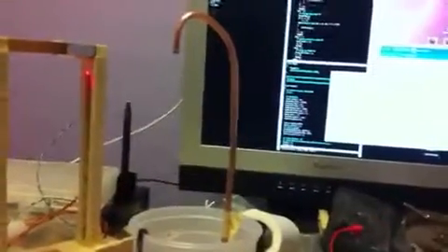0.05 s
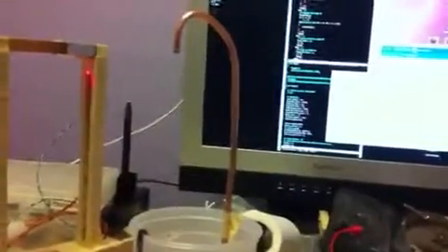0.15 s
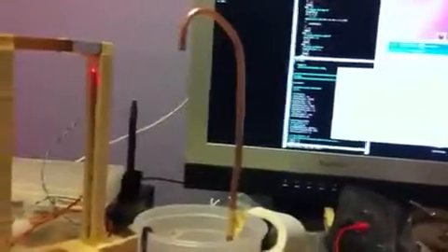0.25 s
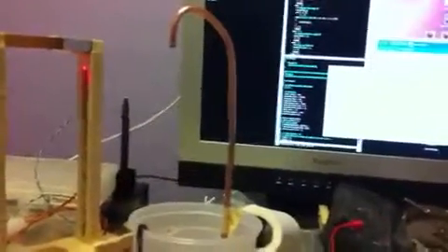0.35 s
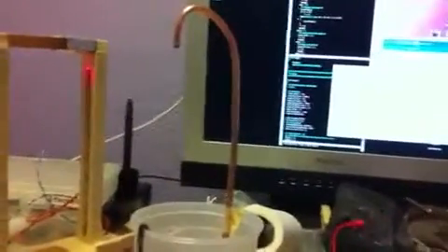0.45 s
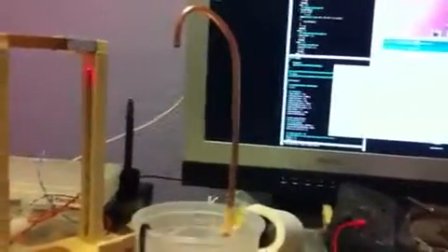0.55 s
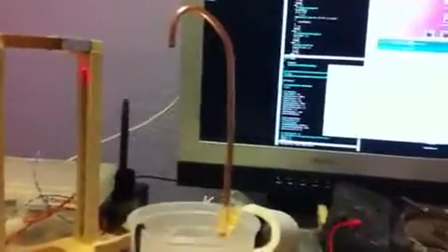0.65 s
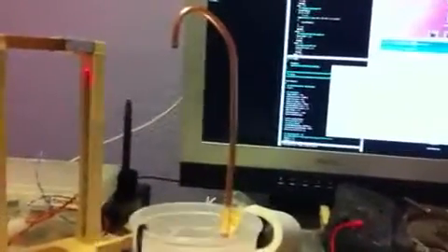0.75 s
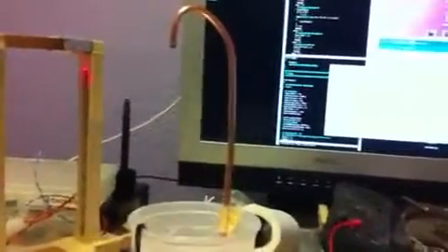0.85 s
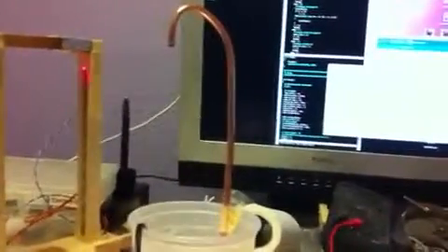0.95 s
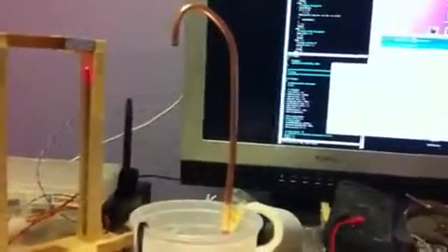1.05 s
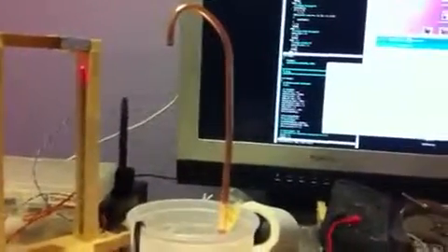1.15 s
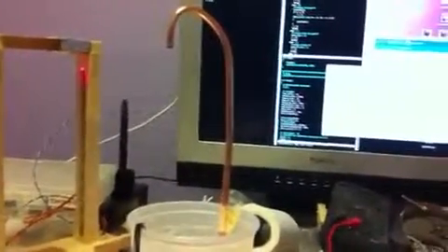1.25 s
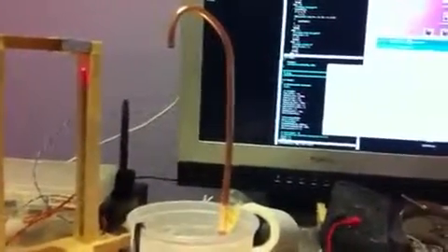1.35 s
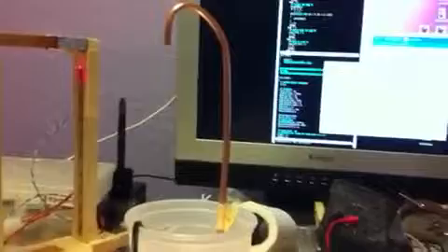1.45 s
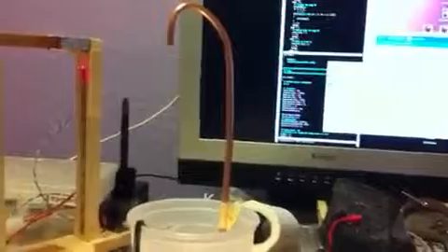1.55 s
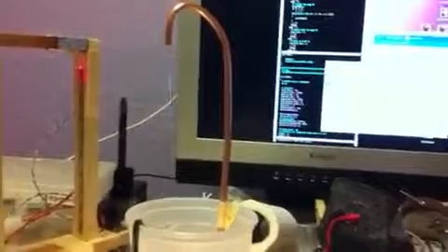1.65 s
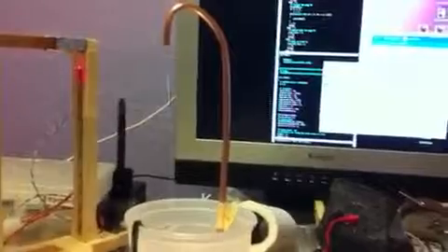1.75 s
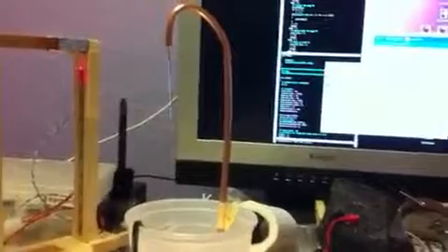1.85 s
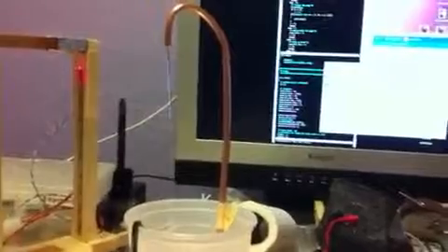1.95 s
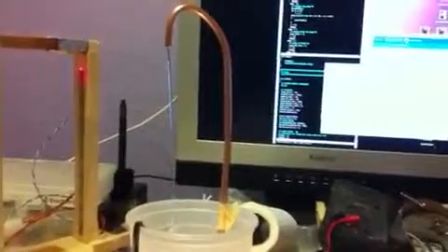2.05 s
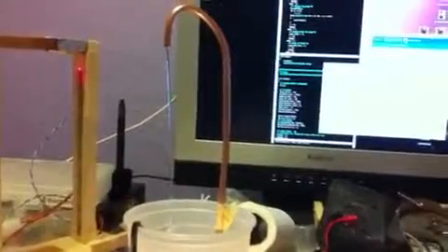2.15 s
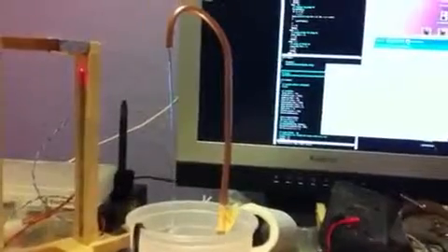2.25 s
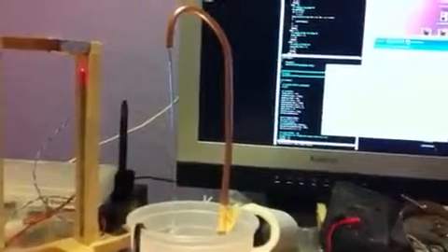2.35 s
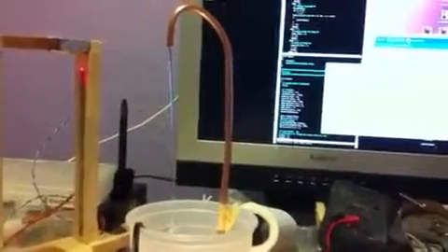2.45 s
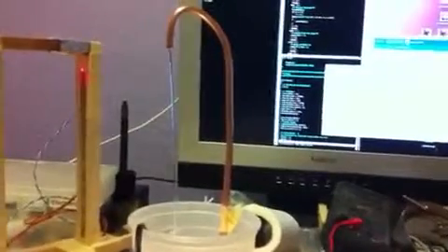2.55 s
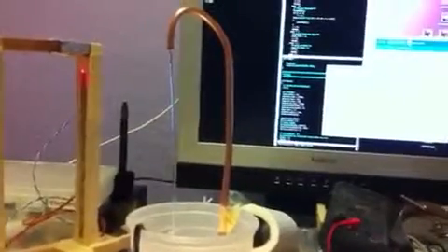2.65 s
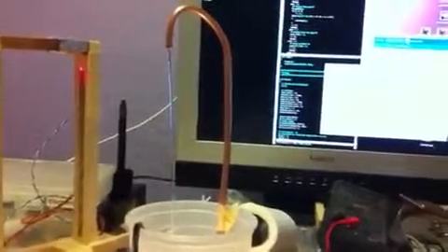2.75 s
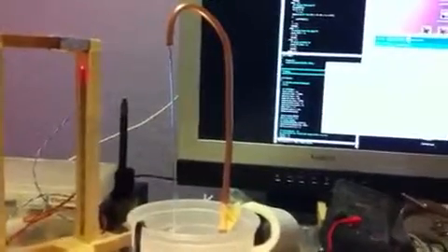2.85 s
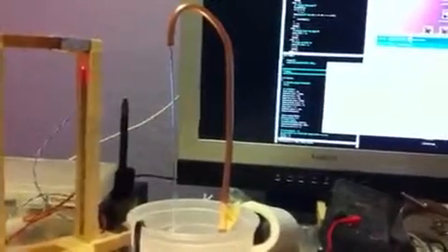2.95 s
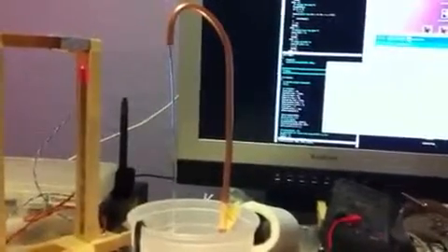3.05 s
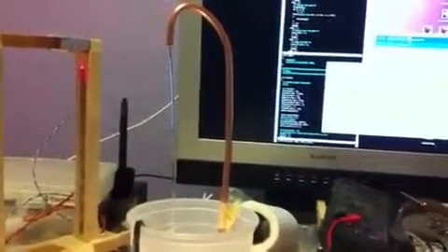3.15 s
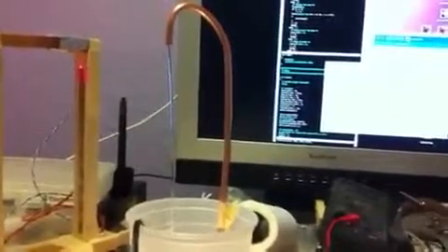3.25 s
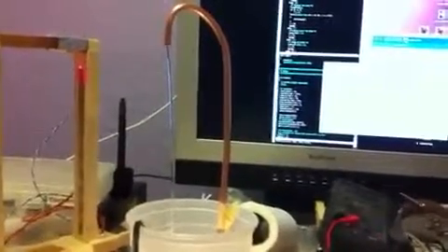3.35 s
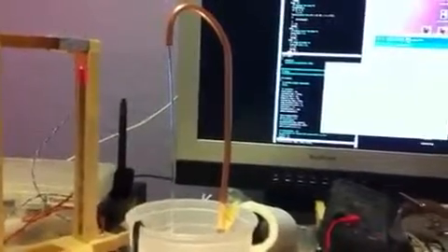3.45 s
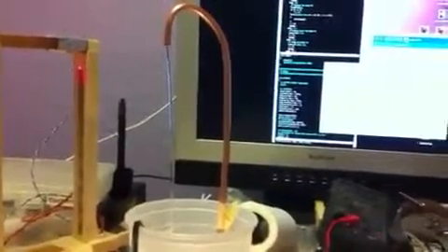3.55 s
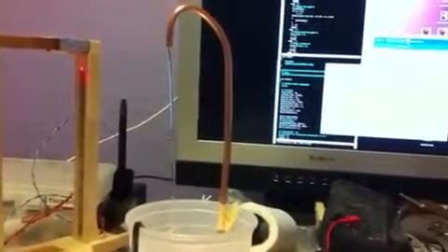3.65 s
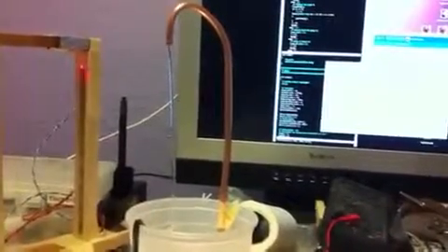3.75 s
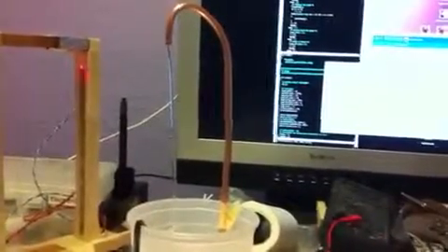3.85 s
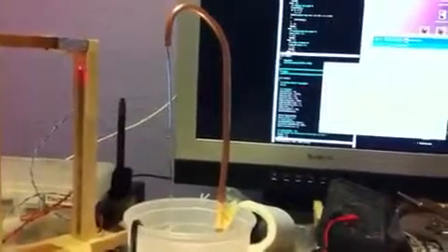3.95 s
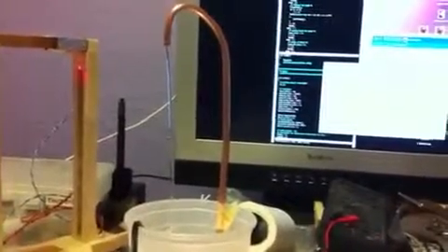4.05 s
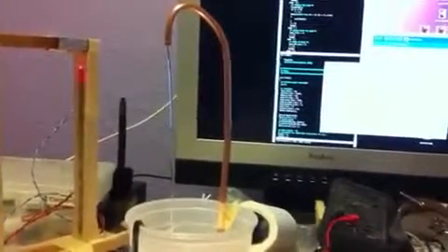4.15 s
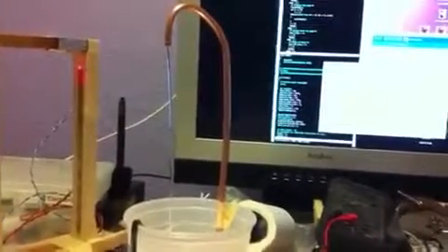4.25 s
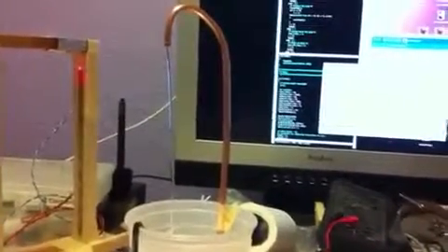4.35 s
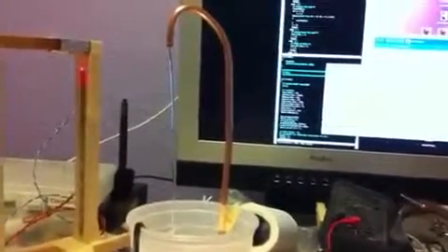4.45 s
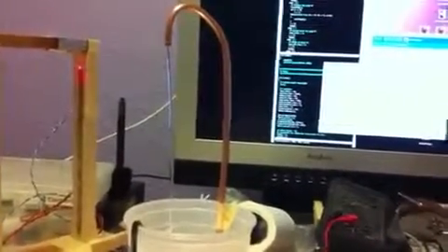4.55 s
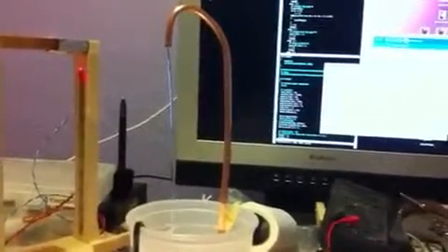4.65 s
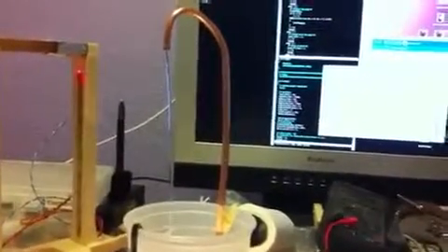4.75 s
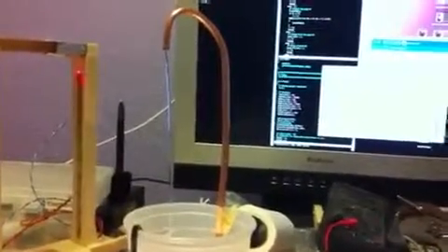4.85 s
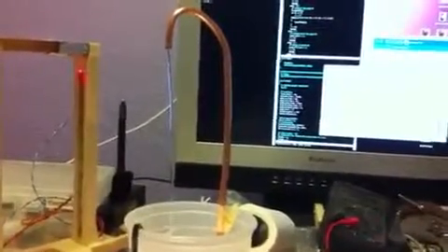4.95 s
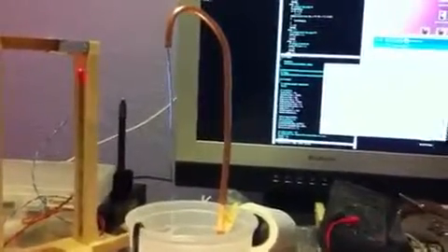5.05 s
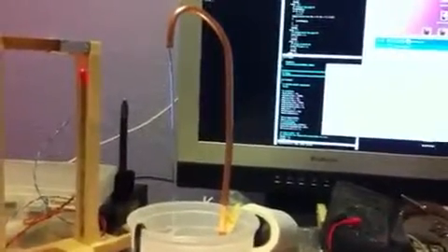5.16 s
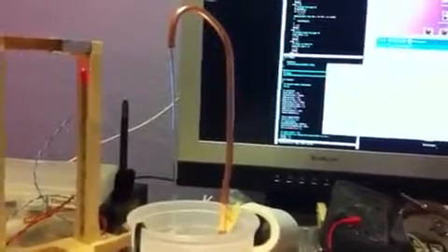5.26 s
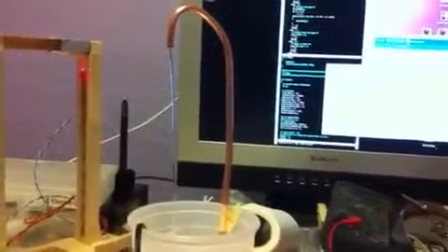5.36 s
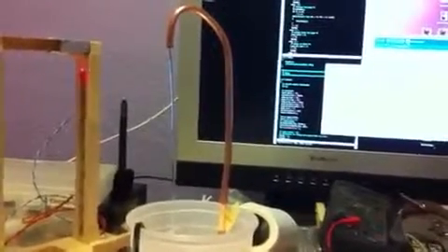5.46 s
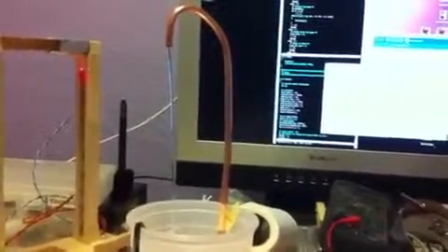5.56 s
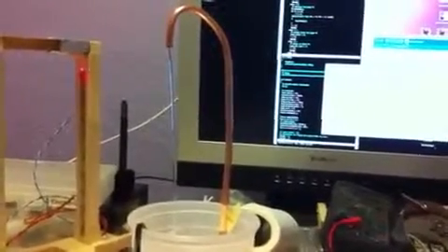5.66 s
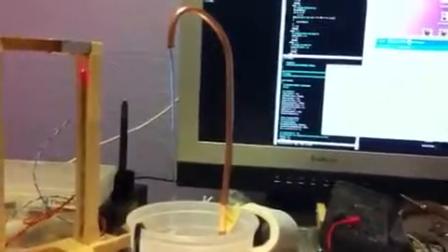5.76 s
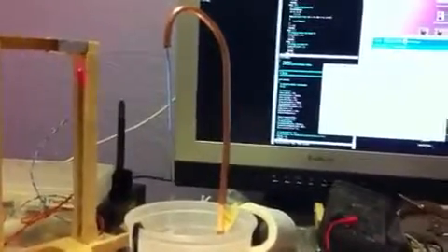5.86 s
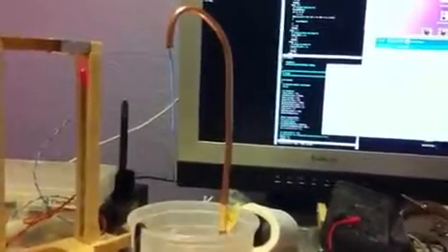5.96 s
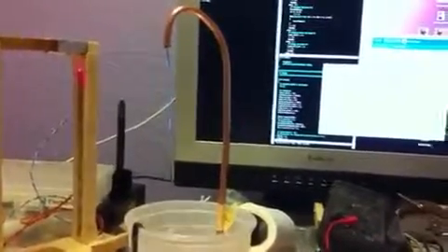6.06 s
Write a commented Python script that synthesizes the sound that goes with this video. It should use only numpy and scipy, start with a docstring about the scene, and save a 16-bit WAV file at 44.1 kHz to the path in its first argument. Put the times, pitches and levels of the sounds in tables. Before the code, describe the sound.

In a small room, a low pump hum and a computer fan's drone sit under soft air noise and a faint high whine. A soft knock comes first, then the pump rises to a buzz. About a second later a thin stream drops into a plastic tub, with hollow, rapid gulps, bubbly chirps and fine bright spatter until the end. One microphone, with short room echoes.

```python
"""First a small pump hums low on a desk in a small room, with a fan's drone, air noise and a faint high whine.
The desk is knocked once and the pump comes up to a buzz; a second later a thin stream falls into a plastic tub.
Gulps of trapped air, made as short swelling tones, ring the tub's hollow; deep plunges raise swarms of bubbles.
Clear bubbles chirp, droplets ping, and filtered impulses make the spray and its ticks on the wall.
One microphone hears it all: resonances add the tub, a sharp reflection and dense echoes add the room."""
import sys
import numpy as np
from scipy import signal
from scipy.fft import rfft, irfft, next_fast_len
from scipy.io import wavfile
from scipy.ndimage import uniform_filter1d, map_coordinates

SR = 44100
rng = np.random.default_rng(int(sys.argv[2]) if len(sys.argv) > 2 else 0)


def wav_record(signal):
    """Record a signal, one row per channel, as 16-bit PCM in the file named by sys.argv[1]."""
    frames = np.transpose(np.atleast_2d(signal))
    bounded = np.clip(frames, -1, 1)
    # unit amplitude maps onto the largest positive 16-bit level
    quanta = np.round(bounded * 32767).astype(np.int16)
    wavfile.write(sys.argv[1], SR, quanta)


N = 268569
T = np.arange(N) / SR
# The first drops land at ARRIVES_S (s); the stream is whole BUILD_S (s) later and then pulls air under.
ARRIVES_S, BUILD_S = 1.85, 0.075
HOLLOW_HZ, HOLLOW_WIDTH_HZ = 810.4, 41

# Gulps of air pulled under by the stream.
# Each row: start in seconds, peak in dB before a common trim, pitch in Hz, time scale in seconds.
GULPS = [(1.9166, -44.5, 850, 0.0053), (1.954, -40.5, 810, 0.0057), (1.969, -40, 809, 0.0054),
         (1.9834, -36, 790, 0.0036), (2.0511, -35, 778, 0.0063), (2.0621, -34, 805, 0.0073),
         (2.0835, -33.5, 804, 0.0054), (2.14, -41, 806, 0.0037), (2.1528, -23, 811, 0.0048),
         (2.1781, -33, 800, 0.0025), (2.2045, -44, 808, 0.0039), (2.2753, -37.0, 816, 0.0039),
         (2.3083, -35.5, 779, 0.0025), (2.3567, -40, 780, 0.012), (2.391, -33, 804.7, 0.0058),
         (2.4233, -35, 827, 0.0015), (2.4815, -31.5, 843, 0.0038), (2.5075, -34, 875, 0.0029),
         (2.5222, -37.5, 821, 0.0049), (2.5358, -36, 950, 0.00164), (2.573, -37, 790, 0.0034),
         (2.6065, -26, 815, 0.0048), (2.6238, -35.5, 814, 0.0028), (2.6551, -35, 843, 0.00546),
         (2.6784, -37, 790, 0.0082), (2.7108, -40.5, 815, 0.0085), (2.7357, -30, 806, 0.0054),
         (2.746, -31, 765, 0.00434), (2.7787, -40, 867, 0.007), (2.8084, -38.5, 838, 0.0055),
         (2.8371, -37.5, 832, 0.005), (2.937, -40, 836, 0.0058), (3.109, -35.5, 854, 0.0022),
         (3.1177, -31.5, 780, 0.0048), (3.1377, -34, 800, 0.006), (3.1988, -37.0, 790, 0.0046),
         (3.2204, -37.5, 795, 0.0053), (3.2841, -38, 831.3, 0.00517), (3.348, -43, 720, 0.0029),
         (3.4015, -33, 815.4, 0.00497), (3.4143, -38, 810, 0.0036), (3.439, -32, 780, 0.0035),
         (3.4766, -35, 790, 0.0036), (3.6166, -41, 822, 0.0095), (3.6667, -35.5, 824.4, 0.0054),
         (3.7222, -38, 789, 0.0072), (3.7559, -38, 847, 0.003), (3.786, -37.5, 713, 0.0049),
         (3.812, -50.5, 680, 0.0079), (3.8343, -39.5, 829, 0.0051), (3.9283, -38.5, 756, 0.0038),
         (3.9529, -40, 818, 0.011), (3.9585, -35, 743.5, 0.0015), (4.0186, -36, 833, 0.0025),
         (4.1011, -37, 863, 0.0032), (4.1356, -34, 799.6, 0.0064), (4.1552, -28, 813, 0.0073),
         (4.2501, -39, 774.3, 0.01), (4.2706, -32.5, 804, 0.0041), (4.2827, -34.5, 826.5, 0.0073),
         (4.3018, -42.5, 883, 0.0074), (4.3157, -37.5, 802.6, 0.0084), (4.4171, -36, 835, 0.0082),
         (4.4957, -34, 776, 0.0071), (4.5162, -26.5, 775, 0.0067), (4.5481, -33.5, 762, 0.00384),
         (4.5683, -35.5, 800, 0.005), (4.5855, -28.0, 842, 0.0028), (4.6024, -34, 823, 0.0033),
         (4.7034, -31, 808, 0.0063), (4.7293, -40, 850, 0.0045), (4.766, -32.5, 805, 0.0038),
         (4.7865, -38.5, 778, 0.0096), (4.847, -31, 812, 0.0052), (4.872, -31, 816.7, 0.0055),
         (4.9186, -27.5, 800, 0.0051), (4.9381, -32, 804, 0.0035), (4.9697, -36.5, 780, 0.0046),
         (4.9913, -38.5, 876, 0.0037), (5.0129, -36, 872, 0.0054), (5.0279, -37.5, 774.6, 0.0045),
         (5.0604, -37, 790, 0.0044), (5.1103, -30.0, 824, 0.0042), (5.1168, -29, 826, 0.0053),
         (5.1858, -27, 804, 0.0053), (5.2075, -33.5, 782.6, 0.00667), (5.2217, -38, 826, 0.0066),
         (5.2556, -32, 822, 0.00523), (5.4196, -32, 792, 0.0034), (5.448, -34, 817, 0.0049),
         (5.4916, -38.5, 784, 0.011), (5.5703, -30, 822, 0.0094), (5.6046, -32.5, 842.6, 0.00414),
         (5.6197, -35, 785, 0.0079), (5.6467, -36.5, 790, 0.0037), (5.6881, -33, 796.8, 0.0039),
         (5.8738, -37, 767, 0.0099), (6.0059, -39, 812, 0.014), (6.018, -34, 797, 0.0049),
         (6.0313, -28.5, 827, 0.011), (6.0723, -39, 810, 0.0064)]


def gulps(trim_db=-1.17, snap_db=-21, wash_db=-33, wash_s=0.018):
    """Each gulp snaps shut and pumps the air in the tub; the water washes back after it."""
    out, wash = np.zeros(N), np.zeros(N)
    t = np.arange(SR // 5) / SR
    for s, peak_db, hz, scale_s in GULPS:
        add(out, s - .001, undb(peak_db + trim_db) * gulp(hz, scale_s))
        add(out, s, undb(peak_db + snap_db) * ring(2000, .0001, 0.00083))
        add(wash, s, undb(peak_db + wash_db) * np.exp(-t / wash_s))
    wash_colour = [(480, 9.0), (680, -13.0), (920, 5.5), (1200, 14.5),
                   (1700, -22.0), (2600, -36.0), (5000, -10.5)]  # (Hz, dB)
    water = unit(colour(impacts(rate=2800, spread_db=-2.5), wash_colour))
    return out + wash * water


def gulp(hz, scale_s, rise_share=0.87, choke=1.19, glide=0.0051):
    """The tone of one gulp of air, peak 1: it swells over a few cycles and is choked off."""
    t = np.arange(int(7 * scale_s * SR)) / SR
    age = t / (rise_share * scale_s)  # 1 at the peak
    swell = age * np.exp((1 - age ** choke) / choke)
    return swell * np.sin(2 * np.pi * hz * t * (1 + glide * (age / 2 - 1)))


def lull(depth_db=-4, after_s=0.0058, width_s=0.0066):
    """The gurgle holds back while a gulp takes the air."""
    dips = sum(np.exp(-((T - s - after_s) / width_s) ** 2) for s, *_ in GULPS)
    return undb(depth_db * dips)


# Pitch of the lesser gulps, lower when the bubbles are bigger. Each row: time in seconds, pitch in Hz.
GURGLE_PITCH = [(2.1, 819), (2.35, 721.2), (2.52, 905), (2.76, 741.7), (2.95, 839), (3.35, 731.8),
                (3.55, 872), (3.82, 746), (3.97, 721.7), (4.1, 841), (4.38, 883), (4.54, 723),
                (4.63, 865.8), (5.05, 818), (5.38, 718.6), (5.52, 813.5), (5.7, 778), (5.87, 879)]
# Reference level of the gurgle in the hollow. Each row: time in seconds, level in dB before trims.
GURGLE_LEVEL = [(2.0, -43.5), (2.25, -51.5), (2.7, -49), (2.95, -46.5), (3.9, -47), (4.5, -45.5),
                (5.6, -45.5), (5.8, -47.5), (6.09, -46.5)]
LESSER_COUNT = 72
# Typical peak over the reference and its spread, spread of pitch, typical time scale.
LESSER_DB, LESSER_SPREAD_DB, LESSER_SPREAD_HZ, LESSER_SCALE_S = 1.5, 2, 25.8, 0.0047


def lesser_gulps():
    """Small gulps follow one another at uneven intervals, their pitch wandering as the stream sways."""
    out = np.zeros(N)
    first_s = ARRIVES_S + BUILD_S
    slots, step = np.linspace(first_s, T[-1], LESSER_COUNT, endpoint=False, retstep=True)
    starts = slots + step * rng.random(LESSER_COUNT)
    for s, (size, pitch, length) in zip(starts, rng.standard_normal((LESSER_COUNT, 3))):
        hz = curve(GURGLE_PITCH, s) + LESSER_SPREAD_HZ * pitch
        tone = gulp(hz, LESSER_SCALE_S * np.exp(0.14 * length))
        add(out, s, undb(LESSER_DB + LESSER_SPREAD_DB * size) * tone)
    return out * undb(curve(GURGLE_LEVEL))


def churn():
    """Lesser gulps of many pitches keep the hollow ringing; the beads of the stream thud on the base."""
    gurgle = swarm(682.3, 933, cycles=6.1, spread_db=3.5, glide=0.067, count=900)
    hollow = sway(resonate(gurgle, HOLLOW_HZ, HOLLOW_WIDTH_HZ))
    fade_in = np.clip((T - ARRIVES_S - BUILD_S) / 0.065, 0, 1)
    hollow = steady(hollow, 0.11) * lull() * fade_in
    beats = impacts(rate=300, spread_db=5)
    thud_colour = [(25, -7), (90, -5.5), (180, -9.5), (280, -1.5),
                   (400, -4.5), (600, -3.5), (1000, 4.5), (2000, -53.0)]  # (Hz, dB)
    thud = unit(colour(beats, thud_colour))
    base = steady(resonate(resonate(beats, 128.5, 30.0), 133.6, 25), 0.11)
    base = base * undb(np.interp(T, [2, 4.5], [-77, -72]))
    return hollow * undb(curve(GURGLE_LEVEL) - 6.0) + flow() * (undb(-62.5) * thud + base)


def sway(x, share=0.45):
    """The hollow's note is pulled along with the pitch of the gulps."""
    shift_hz = share * (curve(GURGLE_PITCH) - HOLLOW_HZ)
    analytic = signal.hilbert(x, next_fast_len(N))[:N]
    return np.real(analytic * np.exp(2j * np.pi * np.cumsum(shift_hz) / SR))


def flow():
    """Share of the stream that has reached the tub, 0-1."""
    return np.clip((T - ARRIVES_S) / BUILD_S, 0, 1)


# Deep plunges of the stream. Each row: start in seconds, level in dB before a common trim.
PLUNGES = [(2.165, -50.5), (2.295, -54), (2.608, -48.5), (3.112, -49.5), (3.405, -61), (4.15, -58.5),
           (4.5, -56), (4.755, -51), (5.18, -54.5), (5.401, -54.5), (5.6, -63)]


def froth(trim_db=1, linger_s=0.047, rise_s=0.0047):
    """Where the stream plunges deep, it leaves a cloud of smaller bubbles that lingers."""
    cloud, t = np.zeros(N), np.arange(SR // 3) / SR
    for s, level_db in PLUNGES:
        swell = (1 - np.exp(-t / rise_s)) * np.exp(-t / linger_s)
        add(cloud, s, undb(level_db + trim_db) * swell)
    bubbles = swarm(1027.0, 2120.0, cycles=3.25, spread_db=2.5, glide=0.062, count=2000)
    return cloud * steady(bubbles, 0.047)


# Colours of the fine bubbles and the spray. Each row: frequency in Hz, relative gain in dB.
FIZZ = [(900, -7.5), (1100, -5), (1400, -9), (1750, -7), (2100, -1.5), (2900, -5), (3400, -6.5),
        (4200, -8.5), (5200, -27)]
SPRAY = [(2500, 19.5), (3700, -3), (4300, 0), (5200, -6.5), (6100, -2), (8000, -6), (10500, -9.5),
         (13000, -10), (15800, -10.5)]
# Levels of the fine bubbles and the spray. Each row: time in seconds, level in dB before a common trim.
FIZZ_LEVEL = [(1.9, -59), (2.1, -58), (2.4, -59), (2.6, -57.5), (3.0, -58), (3.55, -57), (3.85, -56.5),
              (4.3, -56.5), (4.65, -56.5), (5.25, -60), (5.5, -58), (5.9, -58), (6.09, -54)]
SPRAY_LEVEL = [(1.9, -61.5), (2.1, -60.5), (2.25, -64), (2.42, -61.5), (2.72, -62.5), (2.95, -59.5),
               (3.15, -63), (3.4, -63.5), (3.66, -68), (3.9, -61.5), (4.05, -66), (4.4, -62.5), (4.78, -60),
               (4.9, -61.5), (5.05, -63.5), (5.45, -65.5), (5.57, -60), (5.72, -64.5), (6.0, -64)]


def splash(fizz_trim_db=-3.0, spray_trim_db=-3.5):
    """Swarms of fine bubbles, and spray in flurries that each favour their own drop size."""
    together, spray = flurries(rate=26, decay_s=0.0069), 0
    fizz = swarm(1057.0, 5195, cycles=3.53, spread_db=2.5, glide=0.051, count=5000, rise_cycles=1.7)
    fizz = fizz * (1.03 + 0.79 * together)
    for hz in np.geomspace(4600, 14500, 7):  # one band for each drop size
        drops = impacts(rate=900, spread_db=-2.5)
        drops = unit(resonate(resonate(drops, hz, hz / 4), hz, hz / 4)) * np.sqrt(hz)
        spray = spray + drops * (0.13 + 0.93 * together + 1.5 * flurries(rate=45, decay_s=0.0042))
    fizz = steady(colour(fizz, FIZZ), 0.087) * undb(curve(FIZZ_LEVEL) + fizz_trim_db)
    spray = steady(colour(spray, SPRAY), 0.091) * undb(curve(SPRAY_LEVEL) + spray_trim_db)
    return flow() * (fizz + spray)


def lesser_drops(trim_db=-7.0):
    """Faint droplets ping at random among the spray, each at its own pitch."""
    drops = swarm(5153, 14800, cycles=4.1, spread_db=4.0, glide=0.027, count=220)
    drops = steady(scatter(drops, db=5.5, decay_s=0.0027)[:N], 0.55)
    return flow() * undb(curve(SPRAY_LEVEL) + trim_db) * drops


# Spatters, where the stream breaks up and throws a burst of fine drops.
# Each row: start in seconds, level in dB before a common trim, centre in Hz.
SPATTERS = [(1.863, -53.5, 4180), (2.06, -50.5, 2770), (2.307, -49, 3800), (2.472, -56, 5000),
            (2.834, -46.5, 3700), (4.474, -52, 2800), (5.315, -48.5, 5650), (5.381, -48.5, 4700),
            (5.57, -46.5, 5300)]


def spatters(trim_db=1.0, relative_width=0.54, rise_s=0.00082, decay_s=0.0073):
    """Bursts of fine drops that start at once and die away, each with its own drop size."""
    out, t = np.zeros(N), np.arange(SR // 10) / SR
    drops = impacts(rate=2000, spread_db=0.5)
    for s, level_db, hz in SPATTERS:
        burst = drops[int(s * SR):][:len(t)]
        burst = unit(resonate(resonate(burst, hz, relative_width * hz), hz, 2 * hz))
        swell = (1 - np.exp(-t / rise_s)) * np.exp(-t / decay_s)
        add(out, s, undb(level_db + trim_db) * burst * swell)
    return out


# The loudest clear bubbles.
# Each row: start in seconds, peak in dB before a common trim, pitch in Hz, decay in seconds.
BUBBLES = [(2.015, -41, 2640, 0.0027), (2.059, -30, 2466, 0.0017), (2.0665, -44, 2660, 0.00274),
           (2.073, -45, 2500, 0.0021), (2.293, -41.5, 2190, 0.00173), (2.336, -41.5, 3150, 0.0025),
           (2.504, -41, 1960, 0.0012), (2.521, -33, 2350, 0.0014), (2.6, -40.5, 2180, 0.0022),
           (2.743, -44, 2100, 0.0014), (2.68, -45.5, 2300, 0.0015), (2.806, -40, 2500, 0.0015),
           (2.972, -38.5, 2690, 0.0011), (3.182, -42.5, 2320, 0.00172), (3.2827, -41.5, 2340, 0.00104),
           (3.361, -39, 2260, 0.0015), (3.486, -41.5, 2900, 0.0017), (3.62, -33, 2330, 0.00095),
           (4.282, -40, 2120, 0.0025), (4.307, -40, 2356, 0.0021), (4.357, -42, 2204, 0.00283),
           (4.371, -40, 2750, 0.0014), (4.4995, -42, 2130, 0.0016), (4.514, -53, 2200, 0.0015),
           (4.9167, -40, 2530, 0.0017), (4.935, -38.5, 2120, 0.0022), (5.014, -39.5, 2380, 0.001),
           (5.381, -43, 2450, 0.00164), (5.47, -38.5, 2130, 0.0014)]
# The loudest droplets that ping on the water.
# Each row: start in seconds, peak in dB before its fragments are added, pitch in Hz.
DROPLETS = [(1.907, -49, 4240), (2.144, -49, 6660), (2.355, -45.5, 7800), (2.505, -46.5, 7380),
            (3.001, -40.5, 6270), (3.047, -51.5, 4250), (3.694, -39.5, 6000), (3.786, -44.5, 7000),
            (3.8906, -42.5, 6840), (4.022, -51.5, 5840), (4.225, -43.5, 7700), (4.921, -41.5, 7970),
            (5.603, -48, 7290), (5.943, -49, 8700), (6.028, -48.5, 6343)]


def pings(bubble_trim_db=-4.5, rise_share=0.37, chirp=0.127, droplet_cycles=9):
    """Clear bubbles chirp upward, the long ones furthest; a droplet pings and shatters."""
    out = np.zeros(N)
    for s, db, hz, decay_s in BUBBLES:
        tone = ring(hz, rise_share * decay_s, decay_s, chirp * (decay_s / 0.002) ** .5)
        add(out, s, undb(db + bubble_trim_db) * tone)
    for s, db, hz in DROPLETS:
        ping = ring(hz, 0.00071, droplet_cycles / hz, glide=0.097)
        add(out, s, undb(db) * scatter(ping, db=-1, decay_s=0.012))
    return out


# Big bubbles that swell and sweep upward until they burst. Each row: start in seconds,
# peak in dB before a common trim and fragments, first pitch in Hz, last pitch in Hz, length in seconds.
CHIRPS = [(1.857, -49, 2200, 5580, .011), (2.829, -39.5, 1900, 3100, .009),
          (4.193, -42.5, 1800, 3000, .008), (4.471, -33.5, 1600, 2560, .008),
          (5.313, -40.5, 1250, 2400, .017), (5.548, -39, 2200, 3200, .007)]


def chirps(trim_db=-1, burst_share=0.85, spit_db=-7, spit_s=0.0058):
    """A big bubble grows louder and higher as it surfaces, then bursts into fragments."""
    out = np.zeros(N)
    for s, peak_db, first_hz, last_hz, length_s in CHIRPS:
        age = np.linspace(0, 1, int(length_s * SR))
        swell = np.interp(age, [0, burst_share, 1], [0, 1, 0])
        hz = first_hz * (last_hz / first_hz) ** age
        tone = swell * np.sin(2 * np.pi * np.cumsum(hz) / SR)
        add(out, s, undb(peak_db + trim_db) * scatter(tone, db=spit_db, decay_s=spit_s))
    return out


# Distinct ticks of spray on the tub's wall. Each row: start in seconds, peak in dB.
TICKS = [(1.957, -40), (1.982, -44), (2.05, -36.5), (2.082, -41.5), (2.117, -44), (2.14, -51), (2.184, -39),
         (2.307, -47), (2.356, -46.5), (2.391, -50), (2.433, -43.5), (2.47, -38), (2.534, -43),
         (2.602, -43), (2.648, -41), (2.836, -48), (2.892, -43.5), (2.935, -42.0), (3.003, -59),
         (3.032, -49), (3.283, -47), (3.445, -49), (3.486, -42), (3.527, -45), (3.541, -53), (3.604, -35),
         (3.693, -34.5), (3.808, -36.0), (3.834, -44.0), (3.852, -48), (3.874, -43.5), (3.89, -41),
         (3.905, -40), (3.931, -39.5), (3.969, -46.5), (4.135, -43), (4.217, -42.5), (4.253, -45.0),
         (4.439, -50), (4.475, -45), (4.536, -54), (4.665, -45), (4.784, -47.0), (4.837, -41), (4.876, -38),
         (4.915, -48), (4.954, -40), (5.154, -47), (5.185, -47), (5.272, -42), (5.316, -41.0), (5.383, -43),
         (5.469, -46.0), (5.504, -44), (5.571, -46), (5.77, -42.5), (5.892, -42), (5.983, -38.5)]


def ticks(centre_hz=12660, spread_hz=1900, fragments_db=7, fragments_s=0.0025):
    """A bead of spray hits the wall with a dry click, and its fragments land just after."""
    out = np.zeros(N)
    for (s, peak_db), size in zip(TICKS, rng.uniform(-1, 1, len(TICKS))):
        hz = centre_hz + spread_hz * size
        bead = ring(hz, 0.8 / hz, 1.1 / hz)
        click = scatter(bead, db=fragments_db, decay_s=fragments_s)
        add(out, s, undb(peak_db) * click / np.abs(click).max())
    return out


# The tub's ringing, low beside the hollow and high in its wall.
# Each row: frequency in Hz, width in Hz, gain at the centre in dB.
TUB = [(689, 7.6, 2.5), (794, 9.7, -7), (928, 4.8, -14), (944, 37, 1.5), (2172.3, 27, 7), (2672, 28, 1),
       (2966, 60, 0.5), (4186, 110, 3), (4730, 47, 4.5)]


def tub_ringing(water):
    """The tub's narrow resonances, driven by all the water sounds."""
    return sum(undb(db) * resonate(water, hz, width_hz) for hz, width_hz, db in TUB)


# Colour of the treble thrown back by a hard surface near the tub.
# Each row: frequency in Hz, gain in dB.
SLAP = [(2000, -10), (7000, -4), (12000, -1)]


def slap(x, delay_s=0.0092, sway_s=0.00008):
    """One sharp reflection, about 3 m longer on its way, whose delay shifts as the stream sways."""
    late = (T - delay_s - sway_s * walk(12)) * SR
    return colour(map_coordinates(x, [late], order=3), SLAP)


def echoes(x, db, start_s, t60_s):
    """Dense reflections that arrive after start_s and die away."""
    t = np.arange(SR // 2) / SR
    tail = rng.standard_normal(len(t)) * (t > start_s) * undb(-60 * t / t60_s)
    return undb(db) * signal.fftconvolve(x, tail / np.linalg.norm(tail))[:N]


def knock(at_s=0.41, db=-57, hz=240, decay_s=0.031):
    """A soft, low knock on the desk before the pump comes up."""
    out = np.zeros(N)
    add(out, at_s, undb(db) * ring(hz, 0.005, decay_s))
    return out


# Faint dry clicks before the stream arrives.
# Each row: start in seconds, peak in dB before its fragments are added, centre in Hz.
CLICKS = [(.646, -49, 8900), (0.711, -52.5, 7770), (1.569, -51, 8400)]


def clicks():
    """A few faint, bright clicks, each a very short tone with a spatter after it."""
    out = np.zeros(N)
    for s, db, hz in CLICKS:
        add(out, s, undb(db) * scatter(ring(hz, .5 / hz, 0.585 / hz), db=7.0, decay_s=0.0087))
    return out


# Pump hum at full running. Each row: multiple of the stroke rate, rms level in dB.
HUM = [(2, -68), (3, -80), (4, -81), (6, -84), (12, -89), (13, -79)]
# The pump motor's whirr. Each row: frequency in Hz, width in Hz, relative level in dB.
WHIRR = [(819, 170, 0.5), (1104, 210, -2), (1880, 140, -6.5), (2190, 160, 1.5), (2805, 134, 2.5)]
PUMP_HZ = 60.0


def pump():
    """The pump comes up to a buzz of stroke harmonics, with a hiss on every stroke."""
    running = np.interp(T, [.77, .83], [.35, 1])
    stroke = 2 * np.pi * np.cumsum(PUMP_HZ * (1 + 0.0025 * walk(4.897))) / SR
    hum = sum(undb(db) * np.sin(k * stroke + rng.uniform(0, 2 * np.pi)) for k, db in HUM) * np.sqrt(2)
    hiss = unit(sum(undb(db) * resonate(rng.standard_normal(N), hz, width) for hz, width, db in WHIRR))
    hiss *= 1 + 0.35 * np.sin(stroke)
    hiss *= np.clip((T - .81) / 0.014, 0, 1) * undb(np.interp(T, [.9, 1.8], [-71, -75]))
    return running * hum + hiss


def fan(hz=301.5):
    """The computer fan's drone: one tone that drifts a little in level and pitch."""
    level = np.sqrt(2) * undb(-62.0 + 1.05 * walk(10))
    return level * np.sin(2 * np.pi * np.cumsum(hz * (1 + 0.0011 * walk(9.7))) / SR)


# Colour of the air noise in the still room. Each row: frequency in Hz, relative gain in dB.
AIR = [(30, -19), (70, -27), (120, -2), (200, -3), (265, 8), (330, -3.5), (480, -9.5), (1000, -10),
       (2000, -15.5), (2900, -17.5), (3400, -15), (4000, -18.5), (8000, -22.5), (15500, -21)]


def air():
    """Coloured noise under everything, its level drifting slightly."""
    return unit(colour(rng.standard_normal(N), AIR)) * undb(-63.5 + .5 * walk(3.1))


def whine(hz=15601):
    """Electronics whine at a fixed high pitch, sinking early on and wavering in level."""
    level_db = np.interp(T, [.7, 1.2], [-77.5, -84]) + 1.9 * walk(2.0)
    return np.sqrt(2) * undb(level_db) * np.sin(2 * np.pi * hz * T)


def undb(db):
    """Decibels to gain."""
    return 10 ** (np.asarray(db) / 20)


def curve(points, at=T):
    """Read a table of (s, value) at the given times."""
    return np.interp(at, *np.transpose(points))


def unit(x):
    """Scale to rms 1."""
    return x / np.sqrt(np.mean(x ** 2))


def steady(x, span_s):
    """Scale to rms near 1 over every span, keeping the finer grain."""
    span = int(span_s * SR)
    power = uniform_filter1d(uniform_filter1d(x ** 2, span), span)
    return x / np.sqrt(np.abs(power) + np.mean(x ** 2) / 1000)  # the floor spares silent spans


def add(out, s, sound):
    """Mix a sound in at time s."""
    i = int(np.clip(s * SR, 0, N - 1))
    out[i:i + len(sound)] += sound[:N - i]


def resonate(x, hz, width_hz):
    """One resonance, gain 1 at its centre."""
    return signal.lfilter(*signal.iirpeak(hz, hz / width_hz, fs=SR), x)


def colour(x, points, size=4096):
    """Causal minimum-phase filter through (Hz, dB) points."""
    hz, db = np.transpose(points)
    grid = np.log(np.maximum(np.fft.rfftfreq(size, 1 / SR), 1))
    shape = np.interp(grid, np.log(np.r_[hz[0] / 2, hz]), np.r_[db[0] - 20, db])
    cepstrum = irfft(np.log(undb(shape)))
    # folding the cepstrum forward makes the filter causal
    cepstrum[1:size // 2] *= 2
    cepstrum[size // 2 + 1:] = 0
    return signal.fftconvolve(x, irfft(np.exp(rfft(cepstrum))))[:N]


def walk(rate):
    """Smooth random drift, rms 1, with about rate new targets a second."""
    k = int(SR / rate)
    steps = np.repeat(rng.standard_normal(N // k + 2), k)
    return unit(uniform_filter1d(steps, k)[:N])


def ring(hz, rise_s, decay_s, glide=0):
    """A bubble's tone, envelope peak 1: it swells, fades and bends upward as it nears the surface."""
    t = np.arange(int(7 * (decay_s + rise_s) * SR) + 2) / SR
    swell = (1 - np.exp(-t / rise_s)) ** 2 * np.exp(-t / decay_s)
    return swell / swell.max() * np.sin(2 * np.pi * hz * t * (1 + glide * (t / decay_s / 2 - 1)))


def impacts(rate, spread_db):
    """Random impulses of uneven size and either sign, about rate a second."""
    chance = rng.random(N)
    size = undb(spread_db * np.clip(rng.standard_normal(N), -2, 2))
    return (chance < rate / SR) * size * rng.choice([-1, 1], N)


def swarm(low_hz, high_hz, cycles, spread_db, glide, count, rise_cycles=0.39):
    """Many small bubbles of random pitch, strength and moment."""
    out = np.zeros(N)
    for when, small, strength in rng.random((count, 3)):
        hz = low_hz * (high_hz / low_hz) ** small
        size = undb(spread_db * min(-np.log(1 - strength), 4))
        add(out, when * N / SR, size * ring(hz, rise_cycles / hz, cycles / hz, glide))
    return out


def scatter(sound, db, decay_s):
    """A sound followed by its own short spatter of fragments."""
    t = np.arange(int(5 * decay_s * SR) + 2) / SR
    trail = rng.standard_normal(len(t)) ** 3 * np.exp(-t / decay_s)  # the cube makes it spiky
    trail *= undb(db) / np.linalg.norm(trail)
    trail[0] += 1  # the sound itself
    return signal.fftconvolve(sound, trail)


def flurries(rate, decay_s, rise_s=0.0031):
    """An envelope of quick bursts that die away, rms 1."""
    poles = np.exp(-1 / (np.array([rise_s, decay_s]) * SR))
    return unit(signal.lfilter([1], np.poly(poles), np.abs(impacts(rate, spread_db=3.5))))


def scene():
    """The stream in the tub, in the room, over the machines."""
    bright = splash() + lesser_drops() + spatters() + pings() + chirps() + ticks()
    deep = gulps() + froth() + churn() + lull() * lesser_gulps()
    water = bright + deep
    room = slap(bright) + echoes(bright, db=-4, start_s=0.0068, t60_s=0.29)
    room = room + echoes(deep, db=-6.0, start_s=0.01002, t60_s=0.19)
    background = pump() + fan() + air() + whine()
    return (water + tub_ringing(water) + room + knock() + clicks() + background)[None]


def record(dry, top_hz=15900):
    """The recorder cuts the top with a steep low-pass."""
    return signal.sosfilt(signal.ellip(10, .2, 70, top_hz, fs=SR, output="sos"), dry)


dry = scene()
out = record(dry)
wav_record(out)
```